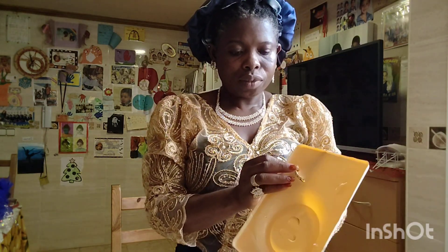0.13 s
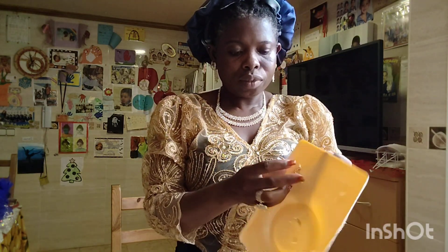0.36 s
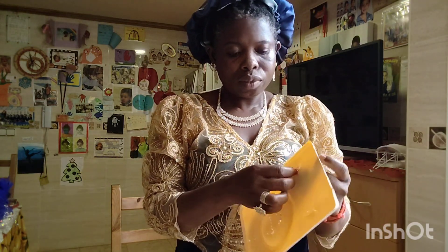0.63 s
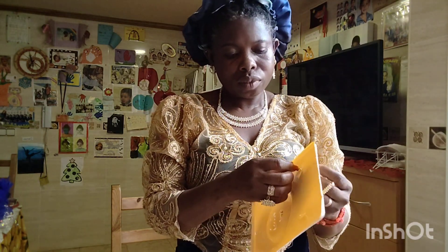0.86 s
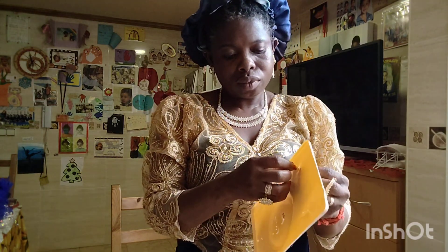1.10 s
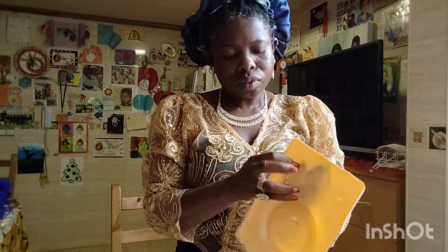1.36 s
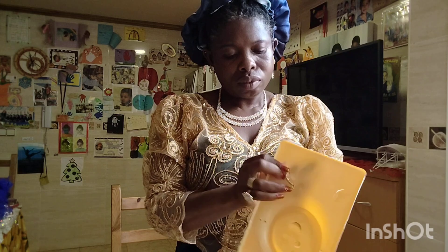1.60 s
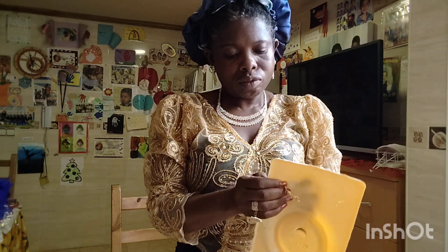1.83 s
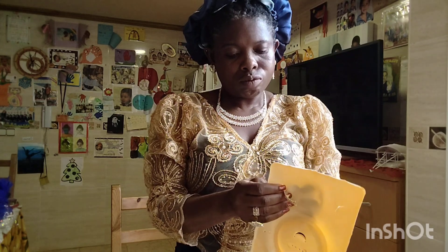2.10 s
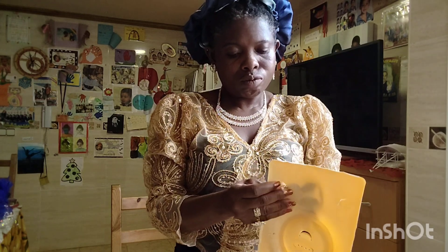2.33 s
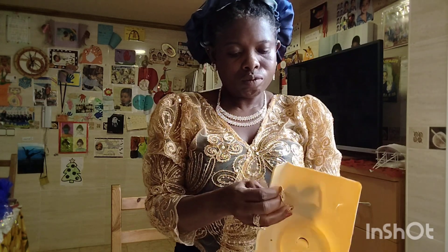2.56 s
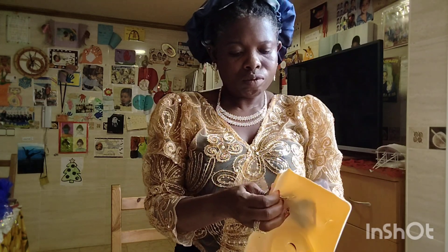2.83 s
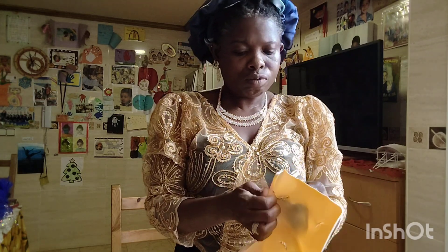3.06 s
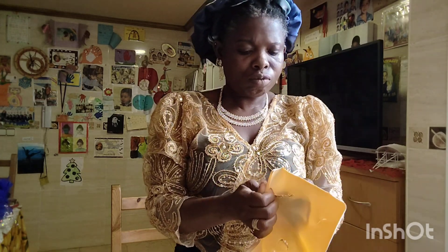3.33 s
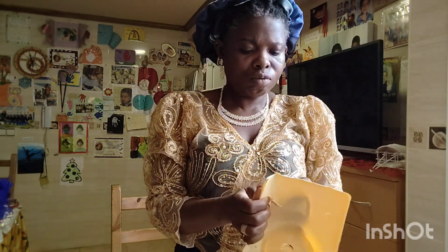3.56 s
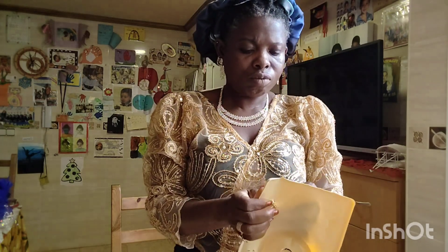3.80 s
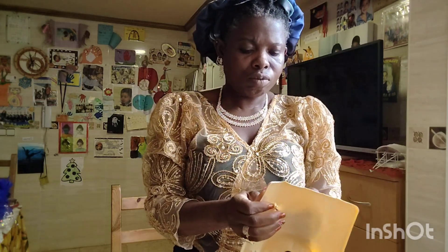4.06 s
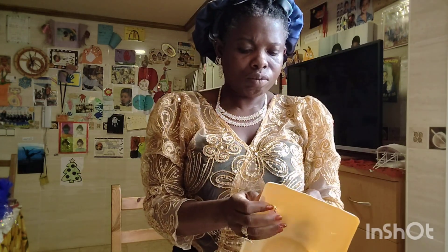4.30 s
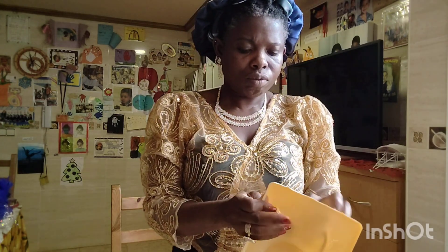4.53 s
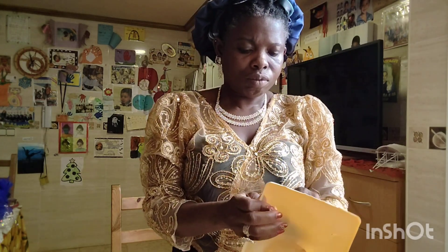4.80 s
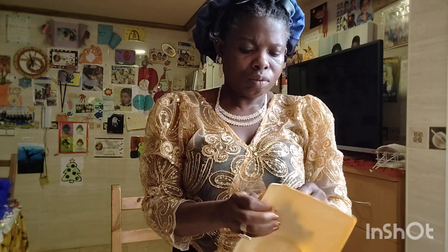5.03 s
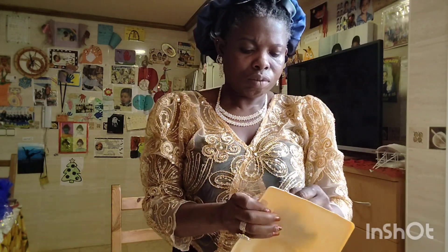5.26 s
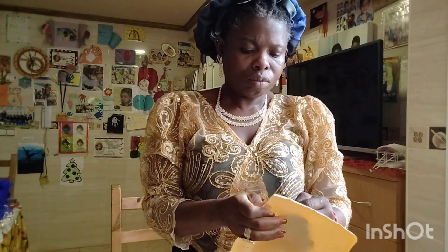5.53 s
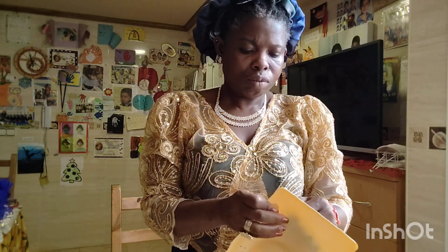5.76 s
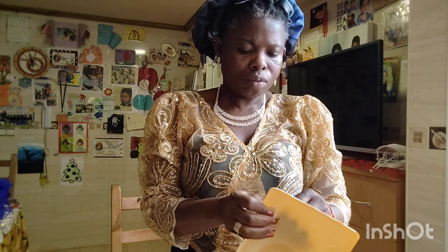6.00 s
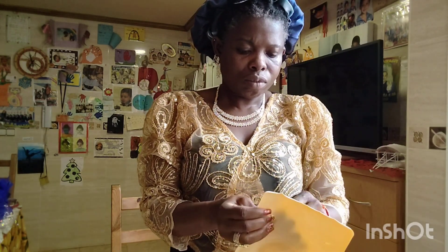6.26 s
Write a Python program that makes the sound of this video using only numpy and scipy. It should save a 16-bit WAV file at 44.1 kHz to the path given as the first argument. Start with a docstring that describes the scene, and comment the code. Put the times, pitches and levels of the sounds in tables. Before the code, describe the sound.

In a quiet indoor room, a thin hard plastic tray is pried and bent by hand. Dry clicks, crackling bursts and tiny creaks start small, grow into isolated hard pops, and peak in one hard snap that momentarily pulls the phone's recording level down. More cracks follow, with another busy burst later, before fading to small ticks over a low soft rumble and faint hiss. Close, dry sound with slight wall reflections.

```python
"""Fingers bend and pry a stiff plastic tray near a phone in a quiet, furnished room.
From the start a low household drone, filtered noise, lies under the faint rustle of the gripping fingers.
Soon snaps follow, each a quick run of micro-cracks that rings the tray's short modes; creaks swell between.
The walls answer with a fading noise tail. Just after the loudest snap, past 3.6 s, the phone turns its
gain down briefly; then snaps and creaks go on, fewer and softer towards the end."""
import sys
import numpy as np
from scipy import signal
from scipy.fft import rfft, irfft
from scipy.io import wavfile
from scipy.ndimage import uniform_filter1d

SR = 44100
rng = np.random.default_rng(int(sys.argv[2]) if len(sys.argv) > 2 else 0)


def boost_factor(decibels):
    """Convert a level in decibels to a linear amplitude factor."""
    exponent = np.asarray(decibels, float) / 20
    return 10 ** exponent


def store_pcm(level_fs):
    """Save levels as 16-bit WAV."""
    pcm = np.round(np.clip(level_fs, -1, 1) * 32767).astype(np.int16)
    wavfile.write(sys.argv[1], SR, np.atleast_2d(pcm).T)


N = 281358  # length in samples

# Four families of tray vibrations, from dull to bright: pitch_hz, level_db (relative, before small
# random changes), t60_s (time to fade by 60 dB, before any extra damping)
THUD = [(345, -8, 0.046), (607, 2, 0.0058), (839, 5.5, 0.0038), (1012, 15.5, 0.0045)]
RING = [(1303, 2.5, 0.015), (1775, 12, 0.0095), (1965, 14.5, 0.0028), (2684, 0.5, 0.017)]
TICK = [(3130, 13, 0.0022), (3650, 2.5, 0.0064), (4600, -6, 0.0088), (5320, 0.5, 0.0045)]
CRACK = [(7480, -5.5, 0.0011), (8946, 1, 0.0016), (9290, -0.5, 0.001), (12400, -1.5, 0.00089),
         (15350, -6, 0.00091)]


def level(x, db):
    """Scale a sound to an rms level in dB."""
    return x * boost_factor(db) / np.sqrt(np.mean(x ** 2))


def shaped(points):
    """Colour random noise by drawing its spectrum through (Hz, dB) points."""
    hz, db = np.transpose(points)
    f = np.arange(N // 2 + 1) * SR / N
    gain = boost_factor(np.interp(np.log(f + 1), np.log(hz), db))
    return irfft(rfft(rng.standard_normal(N)) * gain, N)


def band(x, hz, width):
    """Resonate around one pitch with a two-pole filter whose gain is 1 at the centre."""
    return signal.lfilter(*signal.iirpeak(hz, hz / width, SR), x)


def walk(rate):
    """Wander between random levels, each held 1 / rate seconds and smoothed twice; spread near 1."""
    hold = int(SR / rate)
    steps = np.repeat(rng.standard_normal(N // hold + 1), hold)
    smooth = uniform_filter1d(uniform_filter1d(steps, hold), hold)
    return 1.3 * smooth[:N]


def drone():
    """Household rumble gathered by the room's low resonances, over faint hiss, slowly swelling."""
    # Colour of the steady noise: pitch_hz, level_db (per Hz, relative)
    drone_colour = [(18, -63), (30, -20), (54, -79), (107, 1.5), (167, -5.5), (235, 11.5), (480, -24),
                    (608, -27.5), (1490, -34), (3130, -23.5), (4180, -45), (7280, -47), (9730, -36),
                    (15200, -37), (16500, -50)]
    # Room resonances: pitch_hz, width_hz, level_db (rms, before the slow swell)
    room_hum = [(131.2, 6, -57), (218.4, 42, -49.5), (239, 92, -81)]
    steady = level(shaped(drone_colour), -47)
    hum = 0
    for hz, width, db in room_hum:
        hum = hum + level(band(rng.standard_normal(N), hz, width), db)
    swell_db = .7 * walk(1.5)
    return (steady + hum) * boost_factor(swell_db)


def ring(modes, chance, damp=1):
    """Decaying modes; chance shifts and weights them a little, as the bent sheet does at each snap."""
    hz, db, t60 = np.transpose(modes)[:, :, None]
    # Bending waves travel faster at high pitch, so low modes arrive late
    delay_s = 0.046 * (hz ** -.5 - 16000 ** -.5)
    t = np.clip(np.arange(2048) / SR - delay_s, 0, None)
    a, b = chance[:2 * len(modes)].reshape(2, -1, 1)
    scatter_db, detune = 2. * a, 1 + .03 * b
    # Neighbouring modes move the struck spot in opposite senses
    side = (-1.) ** np.arange(len(modes))[:, None]
    fade = 1000. ** (-t * damp / t60)
    waves = side * boost_factor(db + scatter_db) * np.sin(2 * np.pi * hz * detune * t) * fade
    # Each family radiates little outside its own range
    edges = .8 * hz.min(), 1.3 * hz.max()
    return signal.sosfilt(signal.butter(3, edges, "band", fs=SR, output="sos"), np.sum(waves, axis=0))


def hands():
    """Dense tiny slips of skin and plastic, mostly faint, ring the tray's modes; creaks swell them."""
    # Creaks of the bent sheet: peak_s, creak_db (swell added to the steady grip),
    # length_s (fall to 30 dB under the peak), skin_db (skin rustle against creak)
    creak_events = [(0.38, -62, .15, -12), (0.6, -68, .3, -8), (1.04, -78, .3, 9), (1.38, -57, .2, -18),
                    (1.72, -57, .2, -9), (2.4, -76, .3, 6), (2.943, -50, .12, -9), (3.133, -68, .2, 8),
                    (3.27, -63, .4, -8), (3.53, -48, .15, -24), (3.72, -40, .11, -16), (4.38, -64, .2, -8),
                    (4.51, -64, .3, -14), (4.68, -60, .15, -14), (4.887, -54.5, .3, -12),
                    (5.149, -37, .17, -21), (5.8, -78, .15, 13), (6.197, -68, .6, -9)]
    rise_per_fall = 0.96  # rise time over fall time
    t = np.arange(N) / SR
    creak, rustle = boost_factor(-80), boost_factor(-77)  # steady grip of the fingers; skin noise
    for s, db, length, skin_db in creak_events:
        from_peak_s = np.maximum(t - s, (s - t) / rise_per_fall)
        swell = boost_factor(db - 30 / length * from_peak_s)
        creak = creak + swell
        rustle = rustle + boost_factor(skin_db) * swell
    out = 0
    # The last number is the average count of slips per second
    for modes, gain, rate in (THUD[1:] + RING + TICK, creak, 900), (CRACK, rustle, 2500):
        happens = rng.random(N) < rate / SR
        # The random boost makes a slip stand out as a tick now and then
        slips = happens * rng.standard_normal(N) * boost_factor(2.4 * rng.exponential(size=N))
        body = signal.fftconvolve(slips, ring(modes, np.zeros(32)))[:N]
        out = out + level(body, 0) * gain
    return out


def energy(y, db):
    """Scale a short sound to the energy of 10 ms at an rms level in dB."""
    return y * boost_factor(db) * np.sqrt(SR / 100 / np.sum(y ** 2))


def snaps():
    """Runs of micro-cracks, densest at the start, strike the modes; returns direct sound and wall feed."""
    # Snaps: start_s, ring_db (rms over 10 ms), depth_db (thud against ring),
    # sharp_db (crackle against ring), run_ms (until 4 in 5 cracks have gone)
    snap_events = [(0.039, -61, -8, -3, 7.5), (0.113, -56.5, 2, -3, 4.8), (0.297, -61.5, -1, -3, 6.3),
                   (0.354, -51.5, -0.5, -13, 2.7), (0.37, -50, -3, -11, 7.7), (0.383, -46, -3, -15, 4.6),
                   (0.498, -56.5, 0.1, -9, 5.2), (0.533, -51, -11, 6, 3.9), (0.572, -53.5, 4, 5, 4.3),
                   (0.636, -61, -6, -0.5, 6.6), (0.77, -58, -2.5, 1.5, 7.6), (0.888, -53.5, -8, -10, 6.1),
                   (0.967, -55.5, 1, 0.5, 6), (1.313, -59.5, -3, 0, 5.4), (1.342, -45, -1.5, 0.8, 2.17),
                   (1.364, -47.5, -0.5, -3, 6.5), (1.378, -49.5, -1, 6, 2.9), (1.458, -42, 0, -7, 2.95),
                   (1.523, -50, 6, -5.5, 11), (1.572, -52.5, -16, -2, 3.3), (1.6392, -49.5, -2, 17.5, 1.7),
                   (1.648, -66, -2.5, 24, 0.8), (1.654, -66, -3, 12, 3), (1.694, -54, -3, -2.5, 9),
                   (1.72, -52.5, 0, 0, 10.3), (1.772, -58, -4, -3, 4), (1.889, -29, 1.2, -30.5, 4.95),
                   (2.361, -49.5, 1.5, 1.2, 6.2), (2.514, -58, 5, -8, 5), (2.524, -45, -3, -15, 2.4),
                   (2.574, -28.5, -2.5, -30, 3.3), (2.589, -44.5, 0, -3, 3.9), (2.683, -50, 1, -16, 2.3),
                   (2.701, -44, 3, -11.5, 4.8), (2.838, -65.5, -3, 7, 4.8), (2.876, -33.5, -5, -10, 6.8),
                   (2.932, -49.5, 3, 2.5, 3.7), (3.037, -40.5, -0.2, -37, 4.3), (3.118, -47, -13, 6, 2.1),
                   (3.123, -27.5, -7.5, -25, 2.47), (3.176, -52.5, 4, 3, 5.8), (3.438, -45, 9.5, -6, 6),
                   (3.451, -35.5, -2.5, -4, 6.4), (3.468, -33, -2, 3, 2.5), (3.477, -33.5, -11, -15, 6.2),
                   (3.62, -27.5, -1.9, -27, 4.8), (3.6636, -12.5, -17.5, -29, 0.8),
                   (3.705, -37, -2, -4, 5.6), (3.764, -40, -21, -27, 8.9), (3.78, -43, -15, -23, 5.6),
                   (3.824, -46, -11, -0.6, 7.6), (3.836, -48, -24, -12, 7.3),
                   (3.879, -44.5, -20.5, -9.5, 2), (4.054, -58, -7, -4, 4.7), (4.078, -51.5, -9, 0.5, 6.5),
                   (4.098, -47, -9, -3, 3.6), (4.277, -45, -2, -18, 3.4), (4.347, -39.5, -3, -27, 3.8),
                   (4.362, -45.5, -2, -17, 2.8), (4.372, -40, -7, -25, 2.4), (4.389, -54, 13, -7, 3.9),
                   (4.448, -44, -0.5, -16.5, 2.66), (4.547, -48.5, 9, -20, 5.1), (4.584, -55, -4, -15, 4),
                   (4.627, -46.5, -2, -20, 3.9), (4.668, -38, -3, -14, 7.4), (4.727, -48.5, 0.4, -21, 1.65),
                   (4.783, -47.5, 5.5, -13.5, 4.9), (4.789, -58, 11, -9, 1.5), (4.835, -50, 2.5, -11, 3.1),
                   (4.884, -31.5, 3, -23.5, 3.6), (4.946, -52, 13, -23, 7.1), (5.029, -30, -8.5, -37, 2.2),
                   (5.038, -31, -20, -1.5, 2.7), (5.044, -51, -9, -1.5, 0.82), (5.05, -55, 5, -3, 7.2),
                   (5.096, -37.5, -3, 3, 2.7), (5.099, -31.5, -8, -4.5, 3), (5.104, -34, -11, -1.5, 0.78),
                   (5.118, -33.5, 0.1, -10.5, 7), (5.319, -48, -3, -23, 3.9), (5.345, -40, -19, -29, 1.97),
                   (5.35, -26.5, -7, -3, 3.7), (5.359, -46.5, 4.5, 8, 1.24), (5.437, -37.5, -6, -23, 4.4),
                   (5.445, -43, 7.5, -21, 4.2), (5.641, -53, 1, -24, 7), (5.745, -58.5, 9, -9, 8.8),
                   (5.811, -65.5, -4, 11, 11), (5.833, -54.5, -4, -12, 4.5), (5.882, -52.5, 4.5, -14, 5.3),
                   (5.993, -59.5, -7, -6, 7.5), (6.12, -51.5, -3.5, -13, 12), (6.192, -52.5, -3, -16, 2.7),
                   (6.353, -56.5, -3, -12, 3.6)]
    # Tick level follows a share of the sharpness, up to a ceiling; harder snaps get more of it
    tick_base_db, tick_share, tick_top_db, tick_per_db = 2.5, .55, -1.5, .06
    tick_tilt = .7  # dull snaps miss the upper tick modes: dB per octave for each dB of dullness
    blur = 1.6  # extra damping of the sound sent to the walls
    near, spread = np.zeros((2, N + 4096))
    for s, ring_db, depth_db, sharp_db, run_ms in snap_events:
        chance, cracks = rng.standard_normal((4, 16)), rng.random((3, 24))
        run = np.zeros(2048)
        at_s = np.clip(run_ms, .3, 40) / 1000 * (cracks[0] / .8) ** 1.2
        # Random push or pull, random strength, later cracks weaker
        strength = np.sign(cracks[1] - .5) * boost_factor(-14 * cracks[2] - 5.6 * cracks[0])
        np.add.at(run, (at_s * SR).astype(int), strength)
        i = int(s * SR)
        tick_db = min(tick_base_db + tick_share * sharp_db + tick_per_db * ring_db, tick_top_db)
        tilt_db = tick_tilt * min(sharp_db, 0)  # per octave
        tick = [(hz, db + tilt_db * np.log2(hz / TICK[0][0]), t60) for hz, db, t60 in TICK]
        levels_db = ring_db + np.array([depth_db, 0, tick_db, sharp_db])
        for modes, c, db in zip((THUD, RING, tick, CRACK), chance, levels_db):
            y = signal.fftconvolve(run, ring(modes, c))
            near[i:i + len(y)] += energy(y, db)
            # Summed over all directions the peaks and notches blur: same energy, smoother colour
            spread[i:i + 2048] += energy(ring(modes, c, damp=blur), db)
    return near[:N], spread[:N]


def room(x):
    """Echo from the walls: a diffuse noise tail builds over a few ms and dies band by band."""
    # Bands of the tail: pitch_hz, t60_s (time to fade by 60 dB), level_db (before a weight by pitch)
    tail_bands = [(315, 0.26, -44.5), (585, 0.44, -34), (1380, 0.43, -38), (3060, 0.39, -35.5),
                  (6160, 0.42, -30), (11200, 0.29, -27.5)]
    t = np.arange(int(.8 * SR)) / SR
    tail = 0
    for hz, t60, db in tail_bands:
        noise = band(band(rng.standard_normal(len(t)), hz, hz), hz, hz)
        tail = tail + boost_factor(db) * noise * np.sqrt(3000 / hz) * 1000. ** (-t / t60)
    build_up = np.clip((t - .003) / 0.0024, 0, 1)
    return signal.fftconvolve(x, tail * build_up)[:N]


def scene():
    """Tray and hands with their echo, over the drone."""
    near, spread = snaps()
    skin = hands()
    return (near + skin + room(spread + skin) + drone())[None]


def duck(x):
    """Gain control: when 5 ms of sound exceed a limit, gain slides down for a hold time, then springs back."""
    limit_db, hold_s = -18, .094
    duck_db, slide = -14, .3  # lowest gain; a slide power under 1 drops fast at first
    power = signal.lfilter(np.ones(220) / 220, 1, x ** 2)
    gain_db, free, hold = np.zeros(N), 0, int(hold_s * SR)
    for i in np.flatnonzero(power > boost_factor(limit_db) ** 2):
        if i >= free:
            free = min(i + hold, N)
            gain_db[i:free] = duck_db * (np.arange(free - i) / hold) ** slide
    return x * boost_factor(uniform_filter1d(gain_db, size=64))


def top_cut(x):
    """Nothing passes above the cut-off."""
    return signal.sosfilt(signal.butter(12, 16830, fs=SR, output="sos"), x)


def record(dry):
    """The phone ducks after overloads, then filters off the deepest bass and the top treble."""
    ducked = duck(dry[0])
    no_bass = signal.sosfilt(signal.butter(1, 60, "high", fs=SR, output="sos"), ducked)
    mix = signal.sosfilt(signal.cheby1(6, .5, 15700, fs=SR, output="sos"), no_bass)
    return top_cut(mix[None])


dry = scene()
out = record(dry)
store_pcm(out)
```